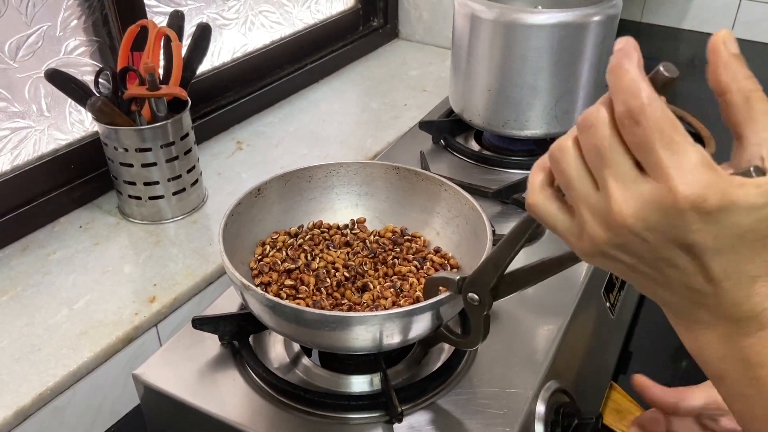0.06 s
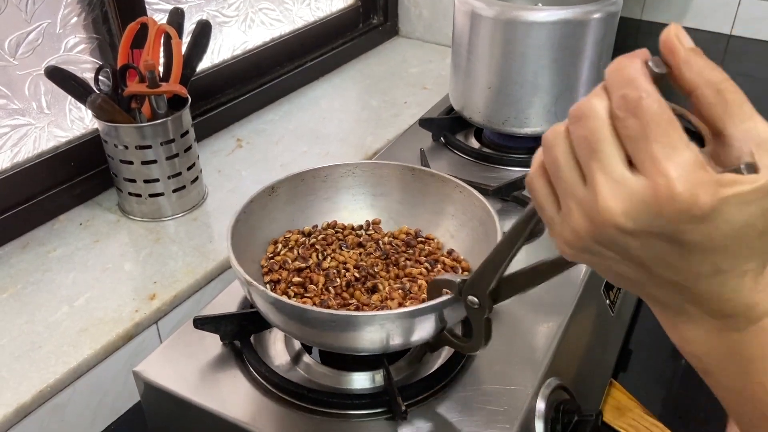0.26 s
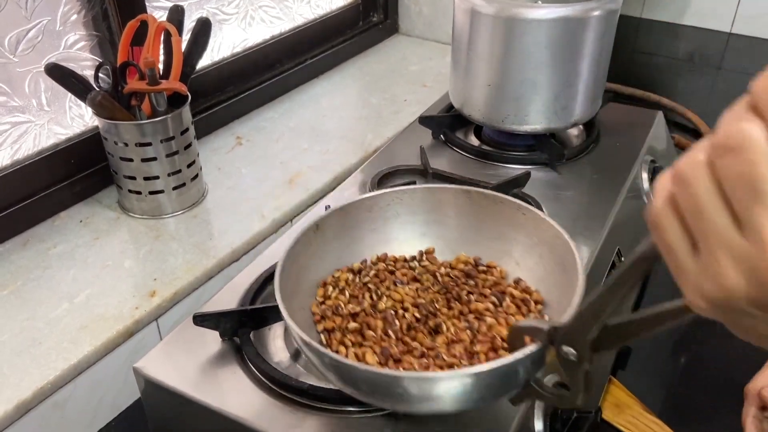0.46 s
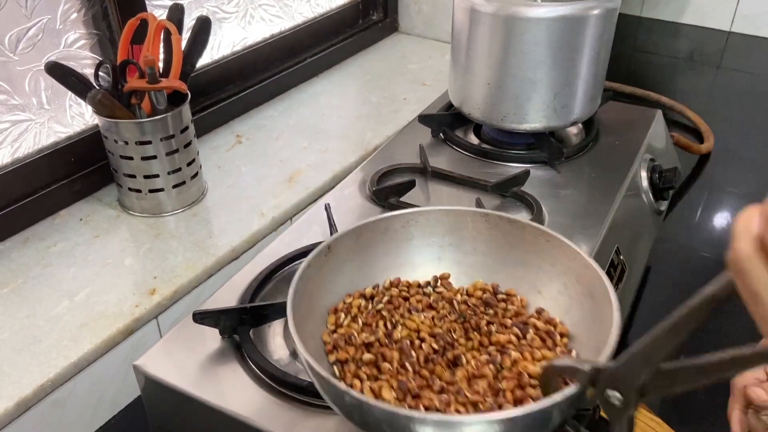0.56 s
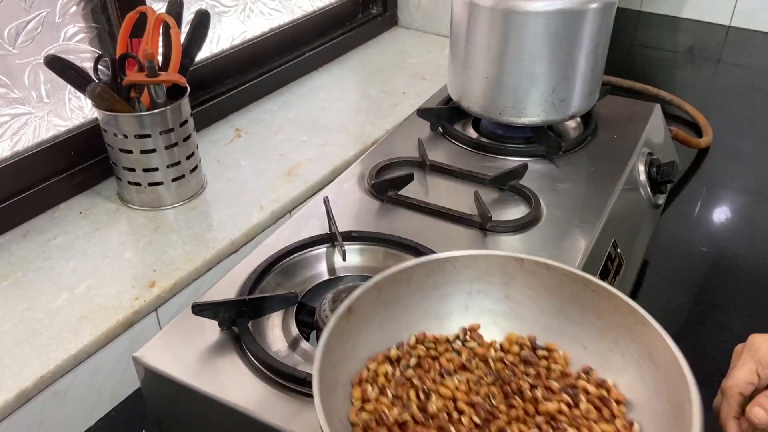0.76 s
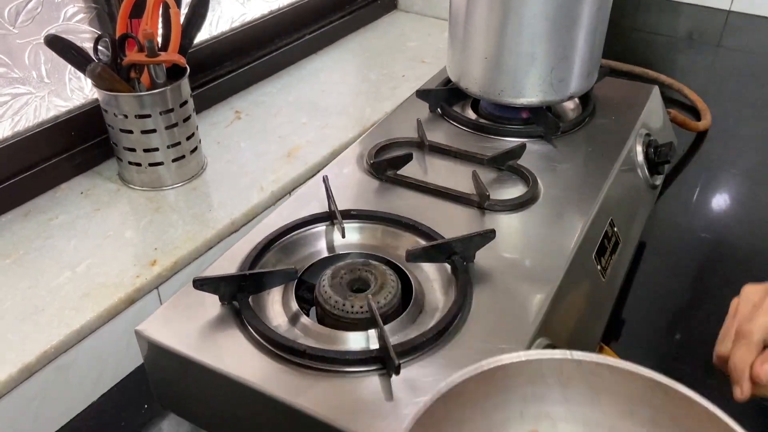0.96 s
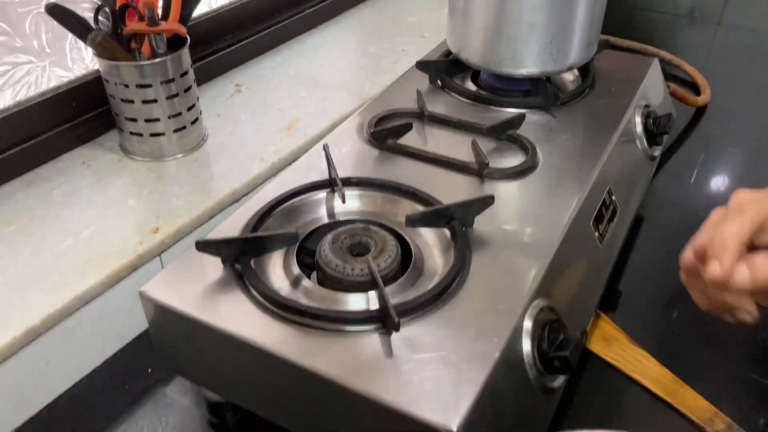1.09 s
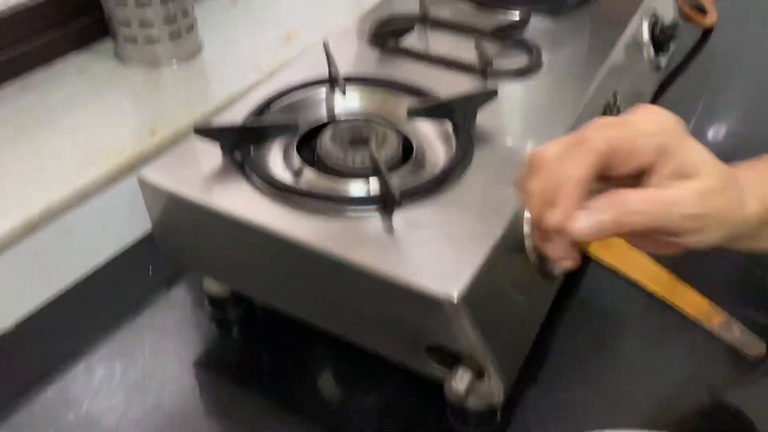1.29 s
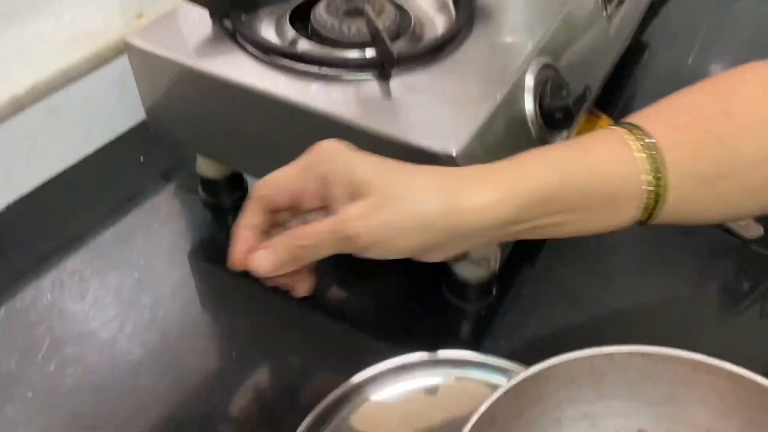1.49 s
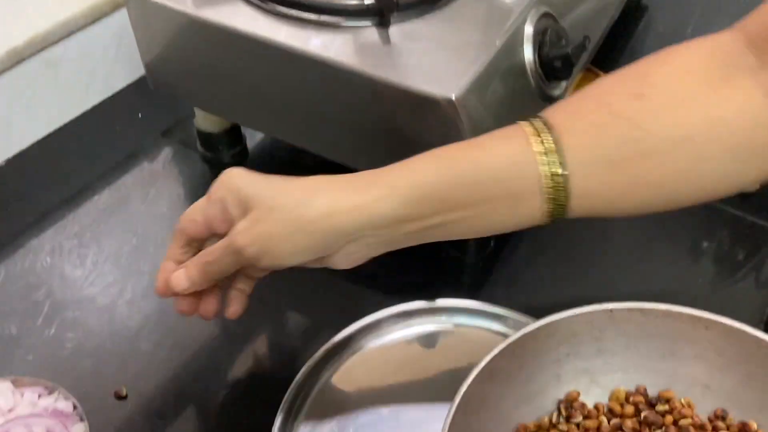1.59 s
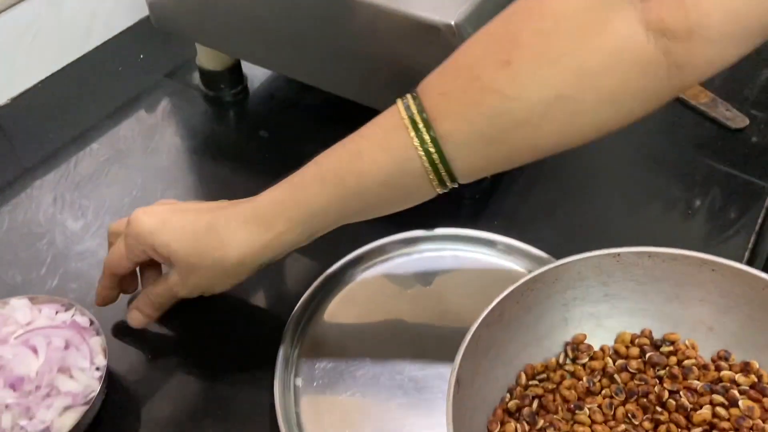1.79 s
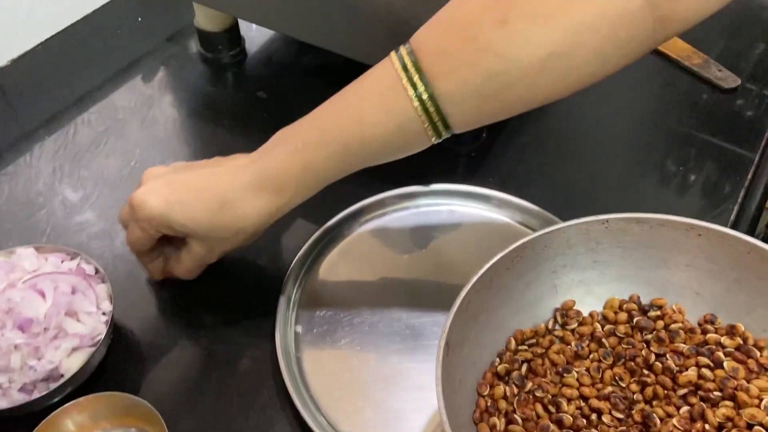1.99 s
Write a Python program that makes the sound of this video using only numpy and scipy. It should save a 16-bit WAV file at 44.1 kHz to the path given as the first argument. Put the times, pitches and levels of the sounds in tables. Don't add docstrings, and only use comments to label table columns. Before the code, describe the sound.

Crackling beans snap loudly in a tiled kitchen as a pan drags ringing over an iron grate

```python
import sys
import numpy as np
from scipy import signal
from scipy.fft import rfft, irfft
from scipy.io import wavfile
from scipy.ndimage import uniform_filter1d

SR = 44100
rng = np.random.default_rng(int(sys.argv[2]) if len(sys.argv) > 2 else 0)


def digitize_waveform(pressure):
    field = np.atleast_2d(pressure).T
    bounded = np.clip(field, -1, 1)
    quanta = np.round(bounded * 32767).astype(np.int16)
    wavfile.write(sys.argv[1], SR, quanta)


def gain_from_decibels(decibels):
    exponent = np.asarray(decibels, float) / 20
    return 10 ** exponent


N = 90404


def evened(x):
    return x / np.sqrt(np.mean(x ** 2) + 1e-20)


def read(points, hz):
    f, value = np.transpose(points)
    return np.interp(np.log(hz + 1), np.log(f + 1), value)


def level(points, column=1):
    rows = np.transpose(points)
    return gain_from_decibels(np.interp(np.arange(N) / SR, rows[0], rows[column], left=-120, right=-120))


def add(mix, s, sound):
    part = mix[..., round(s * SR):][..., :sound.shape[-1]]
    part += sound[..., :part.shape[-1]]


def colour(x, points):
    log_gain = read(points, abs(np.fft.fftfreq(2048, 1 / SR))) * np.log(10) / 20
    response = np.exp(np.conj(signal.hilbert(log_gain)))
    taps = np.fft.ifft(response).real[:1024]
    taps = taps.reshape((1,) * (x.ndim - 1) + (-1,))
    return signal.oaconvolve(x, taps, axes=-1)[..., :x.shape[-1]]


def resonate(x, hz, width):
    turn = np.exp(2j * np.pi * hz * np.arange(x.shape[-1]) / SR)
    r = np.exp(-np.pi * width / SR)
    return 2 * (turn * signal.lfilter([1 - r], [1, -r], x / turn)).real


def air():
    # pitch_hz, level_db
    air_spectrum = [(15, -50.5), (25, -18.5), (208, -19.5), (617, -17.5), (1780, -26.5), (7510, -55),
                    (8830, -51), (14400, -60.5), (16500, -58.5)]
    # pitch_hz, likeness (0-1)
    likeness = [(60, 1), (380, 0.6), (2380, 0.041), (15000, 0.163)]
    hz = np.fft.rfftfreq(N, 1 / SR)
    a, b = rfft(rng.standard_normal((2, N)))
    same = np.clip(read(likeness, hz), 0, 1)
    sides = np.array([a, same * a + np.sqrt(1 - same ** 2) * b])
    return gain_from_decibels(-49) * evened(irfft(sides * gain_from_decibels(read(air_spectrum, hz)), N))


def fan():
    # pitch_hz, width_hz, level_db
    tones = [
        (99, 14, -56.5),
        (198.2, 10.3, -44.5),
        (281.4, 8.7, -53.5),
    ]
    t = np.arange(N) / SR
    hum = 0
    for hz, width, db in tones:
        waver = evened(resonate(rng.standard_normal(N), hz, width))
        hum = hum + gain_from_decibels(db) * (np.sin(2 * np.pi * hz * t) + .22 * waver)
    return hum


def handling():
    # start_s (centre), length_s, pitch_hz, level_db
    bumps = [
        (.08, 0.089, 90, -54.5),
        (.4, 0.13, 79.3, -43),
        (0.764, 0.12, 49, -54),
        (.87, .06, 65, -41),
        (1.035, 0.023, 94, -41.5),
        (1.163, 0.35, 50, -54.5),
        (1.51, 0.16, 45, -24),
        (1.655, 0.16, 48, -36),
        (1.911, .16, 45, -54),
    ]
    t = np.arange(N) / SR
    rumble = 0
    for s, length, hz, db in bumps:
        swell = np.exp(-(2 * (t - s) / length) ** 2)
        rumble = rumble + gain_from_decibels(db) * swell * np.sin(2 * np.pi * (hz * t + rng.random()))
    return rumble


def room():
    # pitch_hz, t60_s
    decay = [(200, .08), (700, .1), (1800, 0.095), (4600, 0.21), (9000, 0.1), (14000, 0.19)]
    # pitch_hz, level_db
    tail_spectrum = [(100, -44.5), (600, -3.5), (2000, 0), (5000, -8.5), (9000, -3), (16000, -20.5)]
    late_db, late_stretch, build_up_s = -14.5, 4.25, 0.0011
    hz, t, z = signal.stft(rng.standard_normal((2, SR)), SR, nperseg=128)
    fall_db = -60 * t / read(decay, hz)[:, None]
    slopes = gain_from_decibels(fall_db) + gain_from_decibels(late_db + fall_db / late_stretch)
    tail = signal.istft(z * slopes, SR, nperseg=128)[1]
    build_up = np.clip(np.arange(tail.shape[1]) / SR / build_up_s, 0, 1)
    tail = colour(tail * build_up, tail_spectrum)
    tail[1] = 0.29 * tail[0] + 0.88 * tail[1]
    return tail / np.linalg.norm(tail[0])


def drag():
    # start_s (time of point), level_db, grit_db
    pulls = [
        [(0, -51.5, -19), (.05, -43.5, -21.5), (.11, -59, -20.5), (.16, -81.5, -1.5)],
        [(.183, -60.5, -16), (.19, -39.5, -36.5), (.3, -34, -27), (.44, -35, -34), (.5, -32.5, -41),
         (.58, -48.5, -40), (.635, -43, -16), (.68, -58, -35), (.8, -74.5, -9)],
    ]
    # pitch_hz, width_hz, level_db
    modes = [(287.6, 8.9, 10), (347, 10, 13.5), (501, 8.3, 2), (555, 10, -53.5), (740, 40, 8), (847, 10, 7),
             (1198, 12, -1), (1490, 35, -14), (1900, 13, -7), (2143, 40, -40.5)]
    # pitch_hz, level_db
    bed_spectrum = [(120, -49.5), (200, -14), (473, -5), (3050, -32.5), (6870, -54.5), (8180, -55),
                    (9000, -42.5), (11700, -100), (19800, -120)]
    # pitch_hz, level_db
    grit_spectrum = [(1500, -3.5), (3000, 4), (5000, -0.5), (7000, -4), (12000, -24.5)]
    bed_db, slips_per_s, slip_spread_db, wet = 5, 3000, 2.5, 0.52
    strength = gain_from_decibels(slip_spread_db * rng.exponential(1, N))
    happens = rng.random(N) < slips_per_s / SR
    slips = strength * happens * rng.choice([-1, 1], N)
    rings = sum(gain_from_decibels(db) * evened(resonate(slips, hz, width)) for hz, width, db in modes)
    bed = evened(colour(slips, bed_spectrum))
    body = evened(evened(rings) + gain_from_decibels(bed_db) * bed)
    grit = evened(colour(slips, grit_spectrum))
    scrape = sum(level(pull) * (body + level(pull, column=2) * grit) for pull in pulls)
    return scrape + wet * signal.fftconvolve(scrape[None], room(), axes=1)[:, :N]


def counter_wave(wave_db, t60):
    bend_turns, bend_s, end_hz = .75, .0004, 38
    head, head_s, rise_s = 0.67, 0.002, 0.0006
    u = np.arange(0, .15, 1 / SR)
    turns = bend_turns * np.log(1 + u / bend_s) + end_hz * u
    decay = gain_from_decibels(wave_db + 9.5 - 60 * u / t60)
    onset = (1 - np.exp(-u / rise_s)) * (1 + head * np.exp(-u / head_s))
    return decay * onset * np.sin(2 * np.pi * turns)


def pop(crack_db, wave_db, body_db, room_db, ring_hz, wave_t60=.1):
    # pitch_hz, level_db
    crack_spectrum = [(180, -31.5), (300, -4.5), (3090, -3.5), (7060, 2), (8800, -2), (10100, 2),
                      (13200, -1.5), (15400, -2.5), (17000, -18)]
    # start_s (delay), level_db
    echoes = [
        (.0082, -12),
        (.0042, -15),
        (.0150, -16),
    ]
    crack_s, lag_s, bounce_s, bounce_db = .00062, .0004, .0017, -4.5
    body_hz, pan_db = 2500, 3.5
    ring_width_hz, ring_gain = 380, 2.2
    t = np.arange(0, .02, 1 / SR)

    def burst(u):
        return (u > 0) * (u / crack_s) * np.exp(1 - np.clip(u, 0, 1) / crack_s) ** 1.5

    def tint(x):
        return colour(colour(x, crack_spectrum), [(body_hz / 2, body_db), (body_hz * 2, 0)])

    shape = burst(t - lag_s) + gain_from_decibels(bounce_db) * burst(t - lag_s - bounce_s)
    crack = rng.standard_normal((2, len(t))) * shape
    for _ in range(4):
        z = rfft(crack)
        crack = irfft(z / np.sqrt(uniform_filter1d(abs(z) ** 2, size=9) + 1e-9), len(t))
        crack = crack * np.sqrt(shape / shape.max())
    crack = tint(np.array([crack[0], 1.02 * crack[0] + 0.13 * crack[1]]))
    crack = crack + ring_gain * resonate(crack, ring_hz, ring_width_hz)
    crack = gain_from_decibels(crack_db) * crack / abs(crack).max()

    smooth = tint(1. * (np.arange(len(t)) == round(lag_s * SR)))
    smooth = smooth + 0.13 * ring_gain * resonate(smooth, ring_hz, 2 * ring_width_hz)
    smooth = smooth * np.linalg.norm(crack[0]) / np.linalg.norm(smooth)
    out = signal.fftconvolve(smooth[None], room() * gain_from_decibels(room_db), axes=1)
    add(out, 0, crack * gain_from_decibels(np.array([[.5], [-.5]]) * pan_db))
    for s, db in echoes:
        add(out, s, crack * gain_from_decibels(db) * rng.uniform(.5, 1.3, (2, 1)))
    add(out, .0016, counter_wave(wave_db, wave_t60))
    return out


def squeaks():
    # length_s, pitch_hz, level_db
    jets = [
        (.022, 6000, -45),
        (.011, 5700, -33),
        (.016, 6600, -26),
        (.011, 4650, -31),
        (.006, 2400, -36),
    ]
    ends = [1.2845, 1.5085, 1.68, 1.68, 1.5085]
    width_hz = 480
    out = np.zeros(N)
    for end, (length, hz, db) in zip(ends, jets):
        u = np.linspace(0, 1, round(length * SR))
        jet = resonate(rng.standard_normal(1500), hz, width_hz)
        jet = resonate(jet, hz, width_hz)[-len(u):]
        add(out, end - length, gain_from_decibels(db) * evened(jet) * np.minimum(1.5 * u, 1))
    return out


def beans():
    # crack_db, wave_db (counter), body_db, room_db, ring_hz
    pop_rows = [
        (-35, -66, 17, 6, 1800),
        (-4.5, -47, -0.5, 2.5, 7200),
        (-36, -66, 0.5, -8, 3900),
        (-4, -37.5, -3.5, -4.5, 6520),
        (-5.5, -37, -0.5, -3, 4500),
        (-6.5, -26, -6.5, 0, 3700),
        (-6.5, -29, 0.7, -1.5, 3600),
        (-2, -27, -1.8, -1.5, 4470),
        (-6.5, -32.5, -2, -1, 3900),
        (-2.5, -41.5, -0.2, -4.5, 4700),
    ]
    pop_starts = [.2104, .3042, .853, .9041, 1.284, 1.3422, 1.5078, 1.679, 1.7521, 1.7653]
    wave_decays = [.1, 0.11, 0.084, .14, 0.11, .14, 0.11, 0.064, .11, 0.057]
    out = np.zeros((2, N))
    for s, row, t60 in zip(pop_starts, pop_rows, wave_decays):
        add(out, s, pop(*row, t60))
    earlier = pop(crack_db=-3.5, wave_db=-60, body_db=6, room_db=0.5, ring_hz=4360)
    add(out, 0, earlier[:, round(.07 * SR):])
    return out + squeaks()


def scene():
    duck_from_db, duck_share, memory_s = -40, 1.2, .085
    pops = beans()
    keep = np.exp(-1 / (memory_s * SR))
    power = signal.lfilter([(1 - keep) ** 2], [1, -2 * keep, keep ** 2], (pops ** 2).mean(0))
    over_db = np.maximum(10 * np.log10(power + 1e-12) - duck_from_db, 0)
    dip = gain_from_decibels(duck_share * uniform_filter1d(over_db, size=600))
    return pops + drag() + (air() + fan() + handling()) / dip


def roll_off(x):
    return signal.sosfilt(signal.butter(12, 17340, fs=SR, output="sos"), x)


def record(dry):
    treble_hz, treble_db, treble_own = 7900, 2.5, .02
    port_lag, port_null_hz, port_lead = 10, 9090, 0.49
    edge_hz, over_edge_db, ceiling = 16050, -17, .85
    hz = np.fft.rfftfreq(N, 1 / SR)
    z = rfft(dry) * np.exp(1j * port_lead * np.array([[.5], [-.5]]))
    high = np.clip((hz - treble_hz) / 600 + .5, 0, 1)
    one = z.mean(0) * gain_from_decibels(treble_db)
    late = one * np.exp(-2j * np.pi * (hz - port_null_hz) * port_lag / SR)
    top = np.array([-late + treble_own * z[0], one])
    wet = irfft((1 - high) * z + high * top, N)
    limited = ceiling * np.tanh(wet / ceiling)
    edge = np.clip((edge_hz - hz) / 200 + 1, 0, 1)
    edge = edge + (1 - edge) * gain_from_decibels(over_edge_db) * (hz < 17300)
    return roll_off(irfft(rfft(limited) * edge, N))


dry = scene()
out = record(dry)
digitize_waveform(out)
```